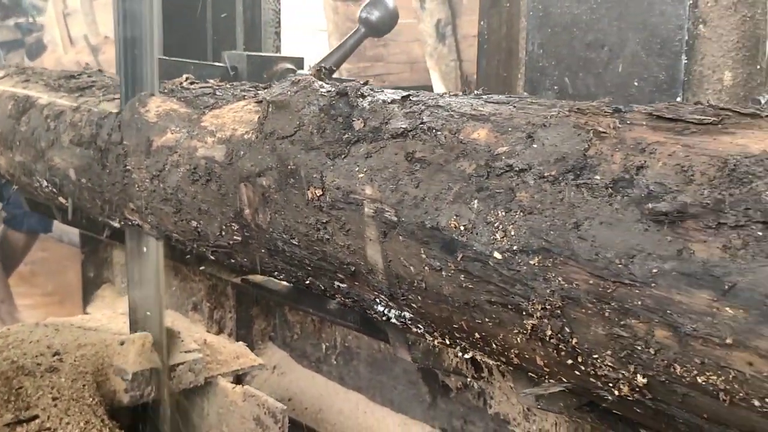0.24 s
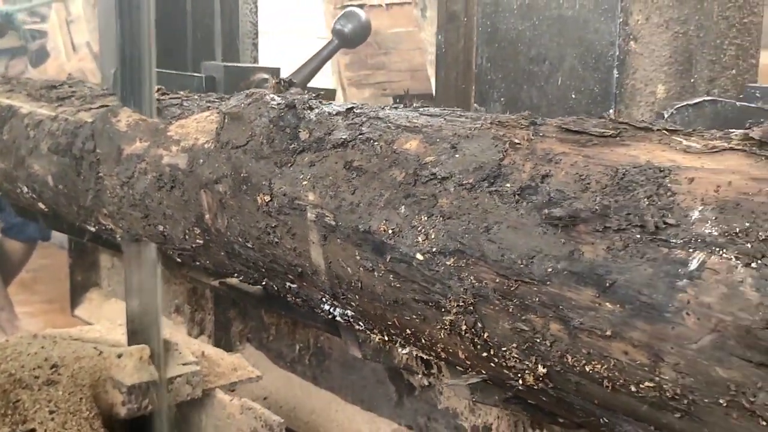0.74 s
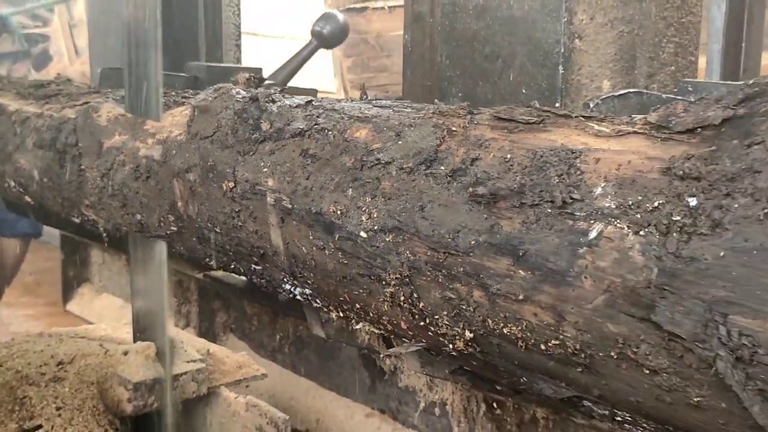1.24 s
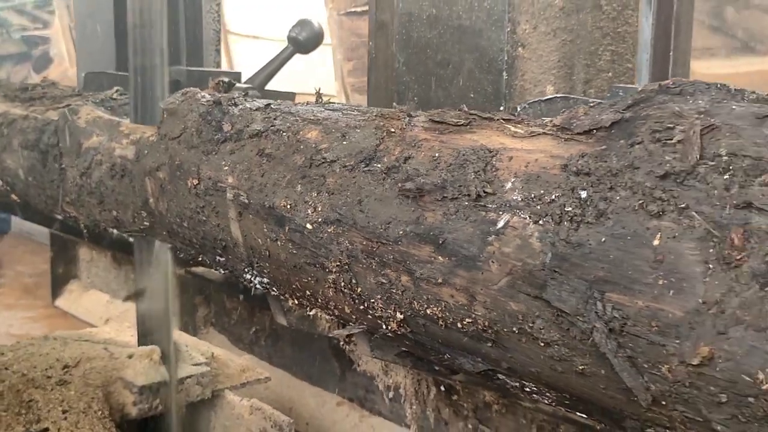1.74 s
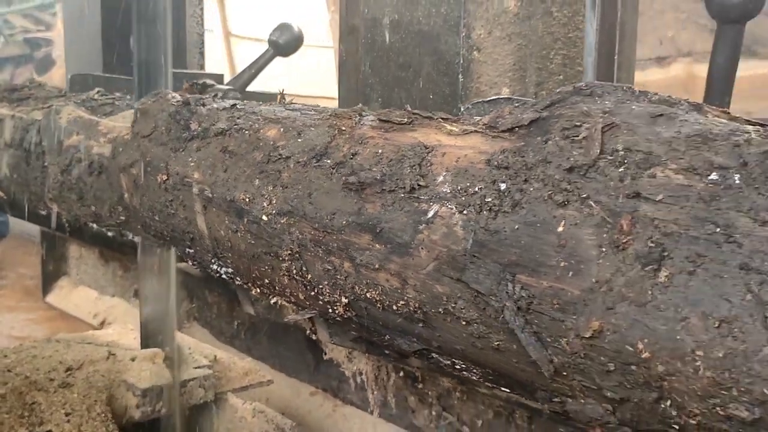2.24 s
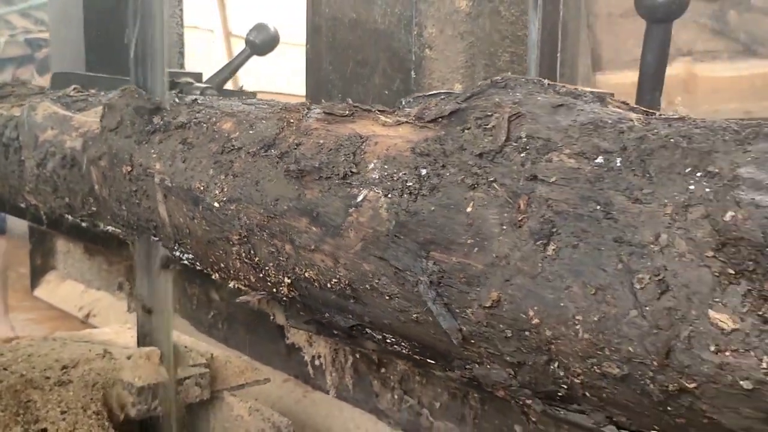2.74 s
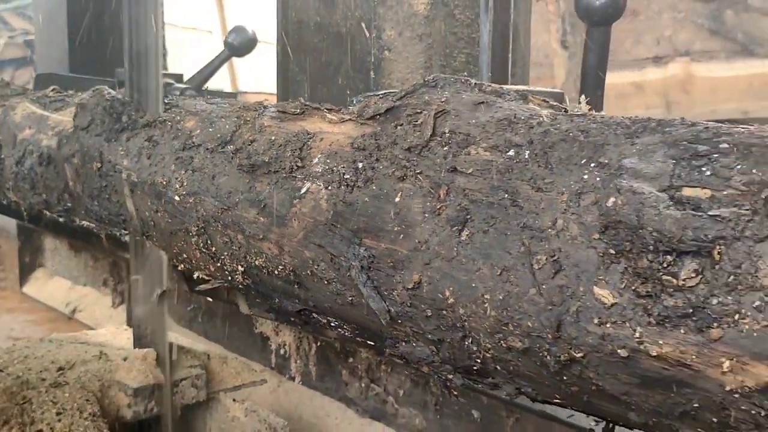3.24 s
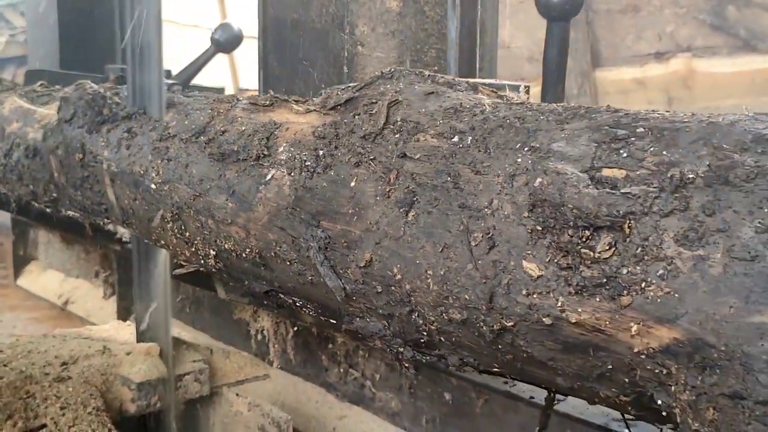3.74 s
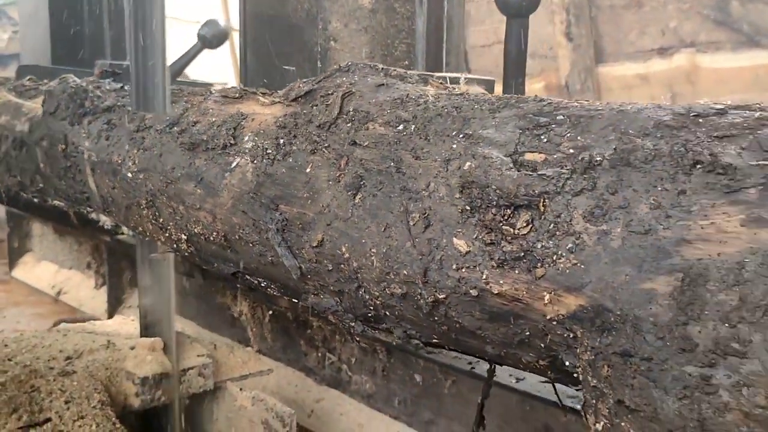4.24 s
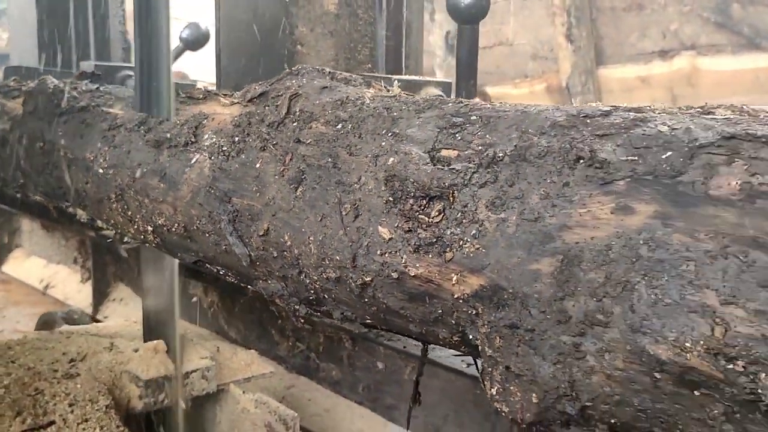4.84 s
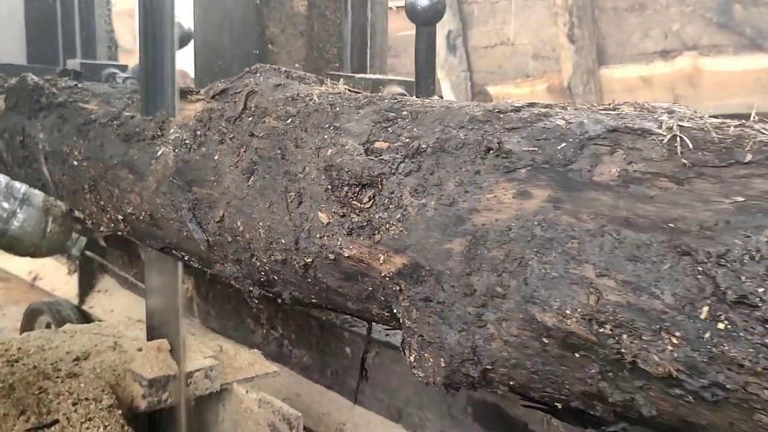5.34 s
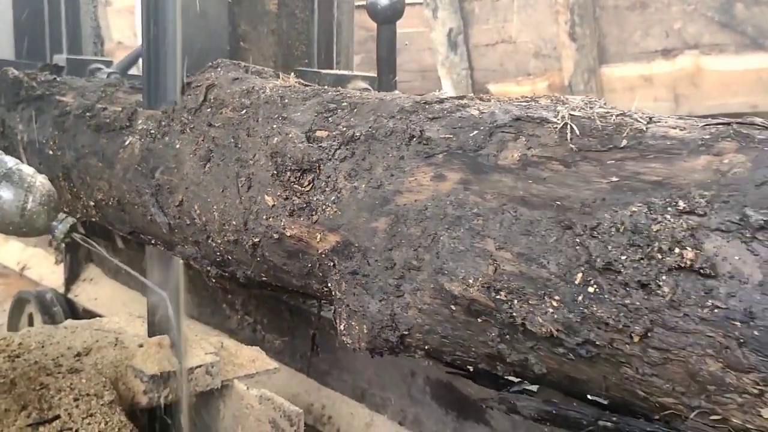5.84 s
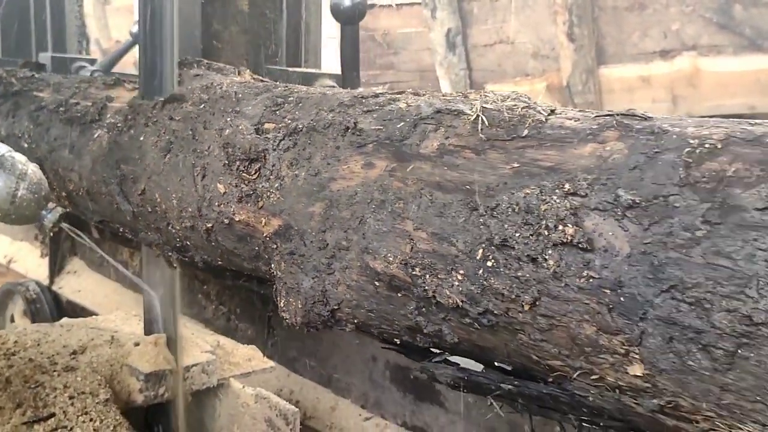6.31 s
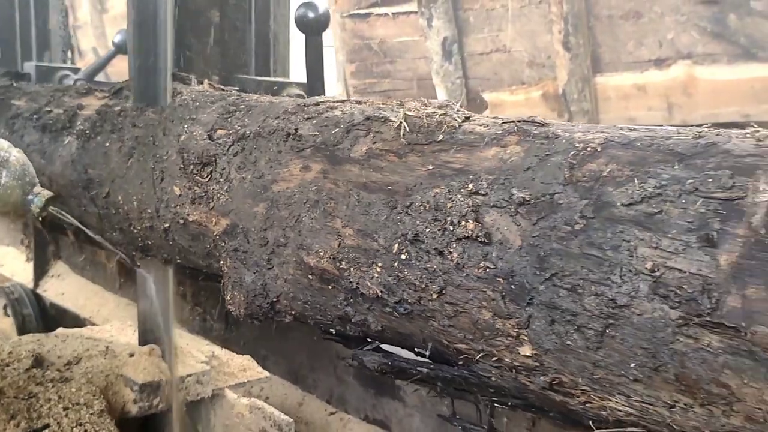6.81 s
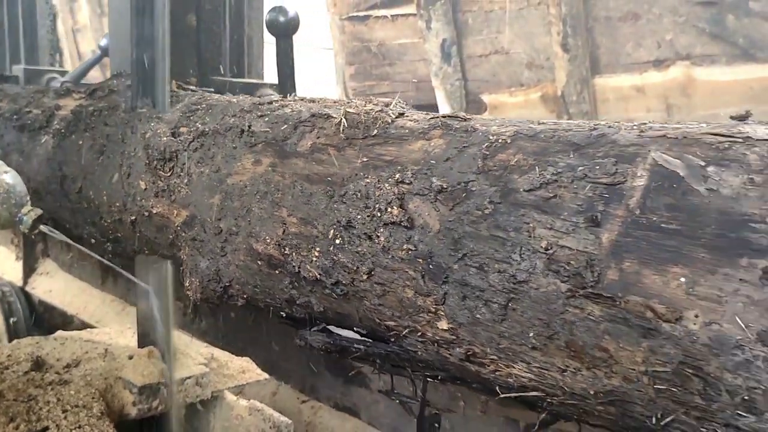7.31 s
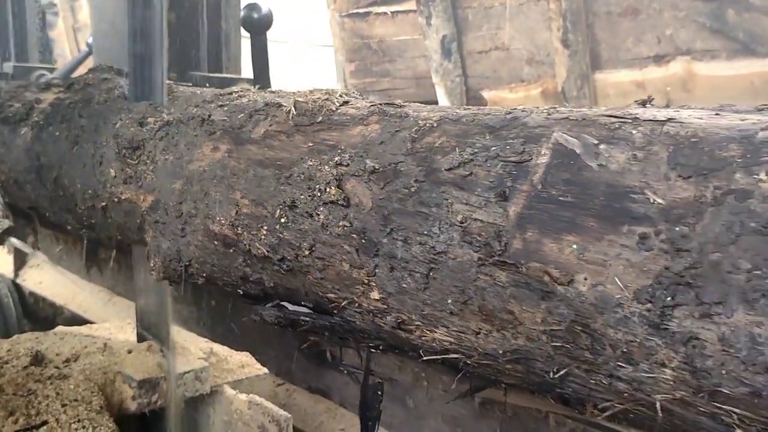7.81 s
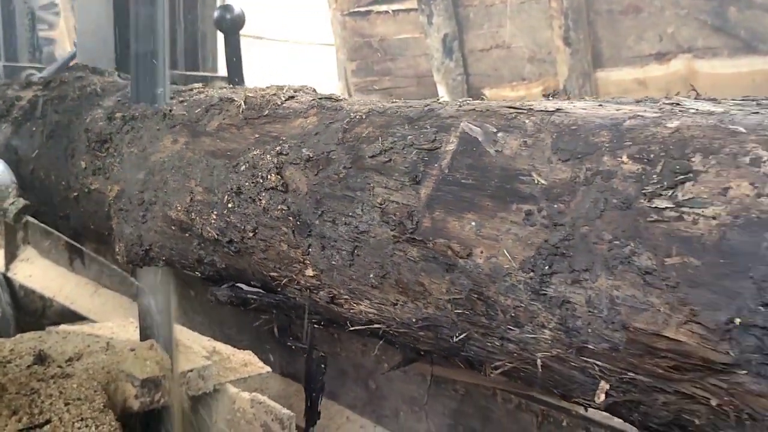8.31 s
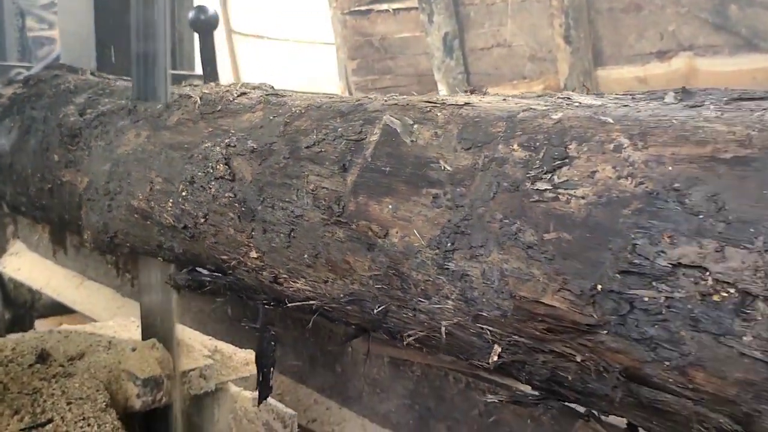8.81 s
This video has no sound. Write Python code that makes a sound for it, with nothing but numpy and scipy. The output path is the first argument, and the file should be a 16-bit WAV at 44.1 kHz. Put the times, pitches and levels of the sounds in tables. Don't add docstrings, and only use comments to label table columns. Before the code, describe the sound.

In an open shed, a one-cylinder diesel chugs without pause, about twelve deep exhaust thumps a second, each followed by ringing metal clatter. A band saw blade rasps through a dry log with a bright steely hiss that swells briefly about three times a second. Faint low bumps come from the log carriage. A phone a few metres away hears the thump centrally and the rattle slightly left.

```python
import sys
import numpy as np
from scipy import signal
from scipy.fft import rfft, irfft
from scipy.io import wavfile
from scipy.ndimage import uniform_filter1d

SR = 44100
rng = np.random.default_rng(int(sys.argv[2]) if len(sys.argv) > 2 else 0)


def voltage_ratio(decibels):
    exponent = np.asarray(decibels, float) / 20
    return 10 ** exponent


def dump_mix(stems):
    frames = np.atleast_2d(stems).T
    limited = np.clip(frames, -1, 1)
    pcm = np.round(limited * 32767).astype(np.int16)
    wavfile.write(sys.argv[1], SR, pcm)


N = 399546
TIME = np.arange(N) / SR
LAP_CYCLES, TEETH = 4.355, 243
LEFT_LEAD = 20
# (f/Hz, width/Hz, level/dB)
BLOCK = [(767, 120, -4.5), (1074, 48, 1), (1371, 28, 5), (1868, 204, -8.5), (2122, 29.6, 4), (2463, 52, -8),
         (2907, 17, 0.5), (3890, 510, -7)]


def gain_curve(points):
    hz, db = np.transpose(points)
    bins_hz = np.arange(N // 2 + 1) * SR / N
    return voltage_ratio(np.interp(np.log(bins_hz + 1), np.log(hz), db))


def colour(x, points):
    gain = gain_curve(points)
    return irfft(rfft(x) * gain / np.sqrt(np.mean(gain ** 2)), N)


def resonate(x, hz, width):
    return signal.lfilter(*signal.iirpeak(hz, hz / width, SR), x)


def rings(x, modes):
    return sum(voltage_ratio(db) * resonate(x, hz, width) for hz, width, db in modes)


def walk(rate):
    hold = int(SR / rate)
    steps = np.repeat(rng.standard_normal(N // hold + 1), hold)
    return 1.95 * uniform_filter1d(uniform_filter1d(steps, hold), hold)[:N]


def engine_speed():
    # (t/s, speed/firings per s)
    speed = [(0, 12.426), (0.5, 12.398), (1, 12.342), (1.6, 12.369), (3, 12.335), (4.6, 12.311),
             (5.2, 12.376), (6.2, 12.323), (7, 12.252), (8, 12.198), (8.4, 12.11), (9.06, 12.104)]
    return np.interp(TIME, *np.transpose(speed))


def effort(cycles, lost_hz):
    # (t/s, level/dB)
    feed = [(0, -1.5), (1, -0.5), (2, -0.5), (3, 0), (4, -0.9), (5, 0), (5.6, -0.7), (6.4, -1), (7.2, -0.5),
            (8.2, -0.35), (9.06, -0.5)]
    feed_db = np.interp(TIME, *np.transpose(feed))
    lap = cycles / LAP_CYCLES
    from_joint = (lap - .58 + .5) % 1 - .5
    swish = np.exp(-(from_joint / .14) ** 2)
    drag_db = 0.55 * np.cos(2 * np.pi * (lap - 0.16))
    firing_db = 0.058 - 3 * lost_hz + drag_db
    rattle_db = -0.092 + 3.4 * lost_hz + feed_db + 0.77 * walk(8)
    hiss_db = -1.54 - 7 * lost_hz + 0.26 * feed_db + 4 * swish
    return firing_db, rattle_db, hiss_db


def beats(cycles, place, scatter_db, jitter_s):
    count = np.arange(-4, cycles[-1] + 1)
    chance = rng.standard_normal((len(count), 2))
    known_cycles = np.r_[cycles[0] - 5, cycles]
    known_s = np.r_[-5 / (cycles[SR] - cycles[0]), TIME]
    at_s = np.interp(count + place, known_cycles, known_s, right=N)
    at = ((at_s + jitter_s * chance[:, 0]) * SR).astype(int) + SR
    train = np.zeros(N + SR)
    keep = (at >= 0) & (at < N + SR)
    train[at[keep]] = voltage_ratio(scatter_db * chance[keep, 1])
    return train


def played(train, shape):
    return signal.fftconvolve(train, shape)[SR:SR + N]


def pipe(cycles, place, spread, modes, scatter_db):
    t = TIME[:SR // 2]
    ring = 0
    for hz, t60, gain in modes:
        ring = ring + gain * np.exp(-np.log(1000) * t / t60) * np.sin(2 * np.pi * hz * t)
    puff = signal.windows.gaussian(801, spread * SR)
    ring = np.convolve(ring, puff / puff.sum())
    train = np.roll(beats(cycles, place, scatter_db, .0002), -400)
    return played(train, ring)


def exhaust(cycles):
    puffs = (.0289, .0022, [(21.8, .6, -.016), (67.9, .348, .115), (87.06, .103, -1.007),
             (95.9, .0664, 1.054), (170, .6, -.143)])
    return pipe(cycles, *puffs, 0.55)


def intake(cycles):
    gulps = (.7771, .0025, [(133.9, .189, .464), (213, .6, -.714)])
    return voltage_ratio(0.5) * pipe(cycles, *gulps, 0.5)


def rattle(cycles, effort_db, lost_hz):
    # (place in cycle 0-1, rise/s, decay/s, centre f/Hz, width/Hz, level/dB)
    knocks = [
        (.0, 0.002, 0.012, 804, 430, -28),
        (.0, 0.0096, 0.01, 2830, 3000, -20),
        (0.15, 0.0082, 0.0071, 2070, 1330, -15),
        (0.16, 0.0067, 0.0058, 3650, 2130, -16.5),
        (0.355, .003, 0.0021, 3460, 1360, -19.5),
        (0.4, 0.00089, .003, 370, 340, -37.5),
        (.92, 0.00063, 0.0071, 1110, 1200, -28),
        (0.17, 0.0057, 0.0084, 4320, 1200, -21),
        (.15, .003, 0.011, 372, 340, -33),
    ]
    t = TIME[:SR // 6]
    echo_shape = (1 - np.exp(-t / 0.004)) * np.exp(-t / 0.007)
    out = 0
    for place, rise, decay, hz, width, db in knocks:
        train = beats(cycles, place, 2.0, .0012)
        direct = played(train, (1 - np.exp(-t / rise)) * np.exp(-t / (2 * decay)))
        echoes = np.sqrt(np.abs(played(train ** 2, echo_shape)))
        chatter = rng.standard_normal((3, N)) * voltage_ratio(1.1 * rng.exponential(size=N))
        near = direct * chatter[0]
        blow = np.array([near, np.roll(near, LEFT_LEAD)]) + voltage_ratio(1.5) * echoes * chatter[1:]
        level_db = db + 10.5 * lost_hz * np.log2(max(hz, 2000) / 2800)
        band = resonate(resonate(blow, hz, width), hz, 1.5 * width)
        out = out + voltage_ratio(level_db) * band * np.sqrt(SR / (5 * width))
    out = out + rings(out, BLOCK)
    return out * voltage_ratio(1.2 * effort_db - 3)


def blade(hiss_db):
    # (f/Hz, level/dB per Hz)
    rasp_colour = [(20, -2), (60, -8), (150, -4.5), (300, -7), (450, -10.5), (600, -10.5), (780, -5),
                   (1150, -8), (2100, -3), (4200, -5), (5200, -9), (6800, -23), (9000, -70)]
    # (f/Hz, level/dB per Hz)
    hiss_colour = [(2000, -20.5), (4500, 0), (6800, -11), (9000, -10), (12000, -11), (13500, -13.5),
                   (14600, -12.5), (15600, -18.5)]
    # (f/Hz, width/Hz, level/dB)
    steel = [(5975, 850, 5.5), (7120, 110, -1), (8220, 370, -4.5), (9180, 320, -13), (10450, 290, -10),
             (13400, 380, -16)]
    chips = rng.standard_normal(N) * voltage_ratio(1.21 * rng.exponential(size=N))
    rasp = colour(chips / chips.std(), rasp_colour)
    rasp = rasp * voltage_ratio(-25.0 + 0.17 * hiss_db + .5 * walk(14))
    rasp = rasp + voltage_ratio(-5) * rings(rasp, BLOCK)
    hiss = colour(rng.standard_normal(N), hiss_colour)
    hiss = hiss * voltage_ratio(-33 + 1.3 * hiss_db + .55 * walk(18))
    return rasp + hiss + rings(hiss, steel)


def saw(hiss_db):
    left, right = blade(hiss_db), blade(hiss_db)
    below = signal.butter(2, 4500, fs=SR, output="sos")
    right = right + signal.sosfiltfilt(below, .36 * np.roll(left, LEFT_LEAD) - .05 * right)
    bass = signal.butter(2, 420, fs=SR, output="sos")
    right = right + .85 * signal.sosfiltfilt(bass, left - right)
    return np.array([left, right])


def teeth(cycles):
    phase = 2 * np.pi * cycles * TEETH / LAP_CYCLES + 1.6 * walk(12)
    return voltage_ratio(-49 + 3 * walk(7)) * np.sin(phase)


def carriage():
    # (t/s, level/dB, f/Hz)
    bumps = [
        (2.68, -32, 30),
        (4.55, -32, 27.8),
        (6.34, -32, 30),
        (7.89, -33, 30),
        (8.72, -29, 29.8),
        (8.96, -30.5, 29.2),
    ]
    out = 0
    for at_s, db, hz in bumps:
        t = TIME - at_s
        out = out + voltage_ratio(db) * np.exp(-(t / 0.017) ** 2) * np.sin(2 * np.pi * hz * t)
    return out


def breeze():
    flutter = colour(rng.standard_normal(N), [(15, -11), (40, -6), (80, 0), (160, -3), (260, -30)])
    return voltage_ratio(-47 + 2.5 * walk(4)) * flutter * np.array([[1], [-1]])


def scene():
    speed_hz = engine_speed()
    lost_hz = 12.33 - speed_hz
    cycles = -.036 + np.cumsum(speed_hz) / SR
    firing_db, rattle_db, hiss_db = effort(cycles, lost_hz)
    thump = voltage_ratio(1.1 * firing_db) * exhaust(cycles) + intake(cycles)
    machine = thump + rattle(cycles, rattle_db, lost_hz)
    return machine + saw(hiss_db) + teeth(cycles) + carriage() + breeze()


def mute_weak_channels(x):
    hz, _, z = signal.stft(x, SR, nperseg=2048)
    power = (np.abs(z[:1024]) ** 2).reshape(128, 8, -1).mean(axis=1) + 1e-18
    channel = uniform_filter1d(power, size=2, axis=1)
    around = uniform_filter1d(uniform_filter1d(power, size=5, axis=0), size=2, axis=1)
    edge_hz = [500, 620, 1200, 1600, 3000, 4400, 5000, 15000]
    edge = np.interp(hz[4:1024:8], edge_hz, [0, .3, .6, .5, .62, .65, .9, .88])
    gate = np.clip((channel / around - edge[:, None]) / .05 + 1, .03, 1)
    z[:1024] *= np.repeat(gate, 8, axis=0)
    return signal.istft(z, SR, nperseg=2048)[1][:N]


def top_cut(x):
    return signal.sosfilt(signal.butter(12, 15390, fs=SR, output="sos"), x)


def record(dry):
    # (f/Hz, level/dB)
    ports = [(60, 0.0), (110, 0.0), (200, -0.5), (380, -1.2), (690, 2.0), (1280, 1.0), (2360, 1.0),
             (4350, 1.0), (8020, 1.6), (14800, 7.5)]
    tilt = np.sqrt(gain_curve(ports))
    left = irfft(rfft(dry[0]) * tilt, N)
    right = irfft(rfft(dry[1]) / tilt, N)
    mid = mute_weak_channels((left + right) / 2)
    side = mute_weak_channels((left - right) / 2)
    return top_cut(np.array([mid + side, mid - side]))


dry = scene()
out = record(dry)
dump_mix(out)
```